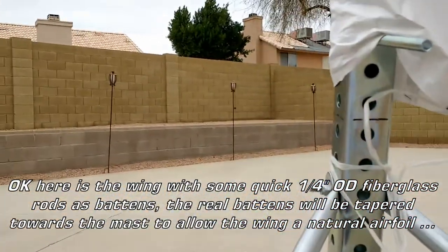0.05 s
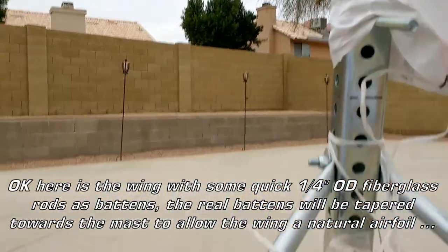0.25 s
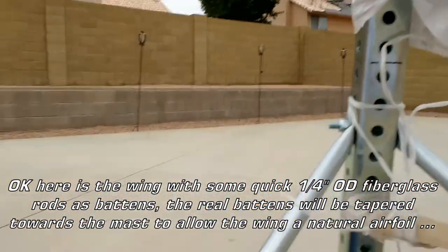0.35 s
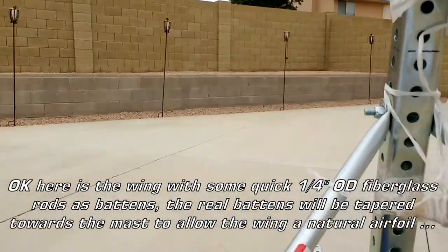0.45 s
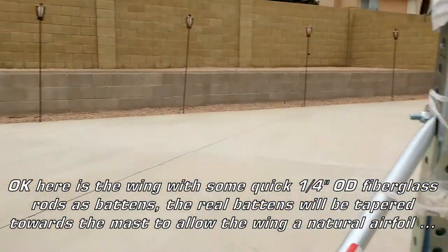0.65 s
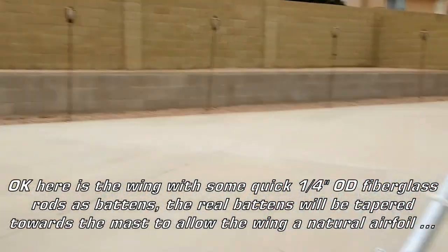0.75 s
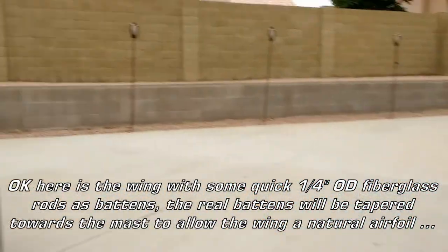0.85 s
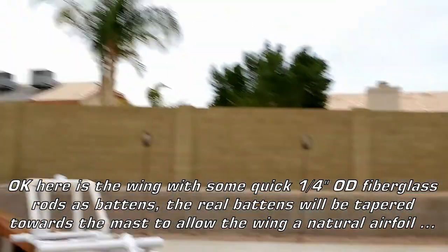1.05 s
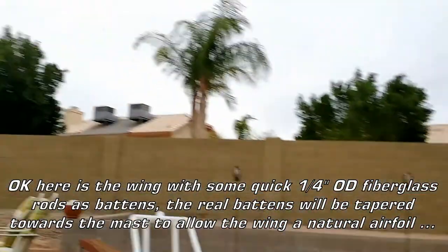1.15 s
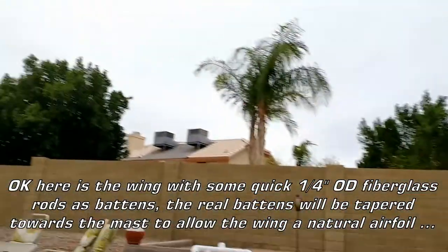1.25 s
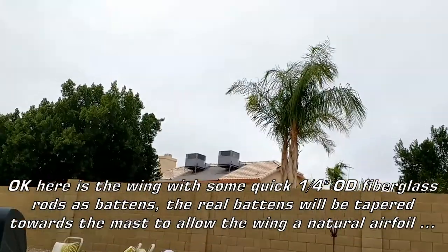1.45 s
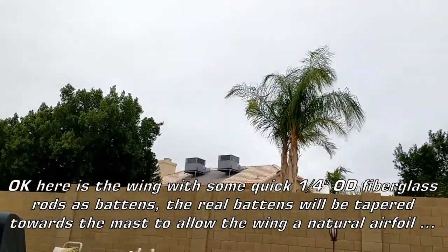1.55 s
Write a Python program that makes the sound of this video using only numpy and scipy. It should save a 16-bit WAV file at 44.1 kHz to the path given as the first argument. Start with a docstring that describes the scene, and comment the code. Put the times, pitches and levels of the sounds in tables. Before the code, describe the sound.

A loose sail sheet rustles and snaps taut from 0.1 seconds, ringing its metal frame, the snaps crowding at 0.3 to 0.5. A faint rubbing tone sinks from 0.6 to 0.9, with one knock at 0.7. Low gusts buffet the microphone, hardest from 0.75 to 1.2. The last snap comes at 1.1, then a sharp, close tick. Rustle and puffs continue over a soft hush of wind in trees.

```python
"""A loose sail sheet on a metal frame in a walled yard, over a hush of wind in trees.
From 0.1 s the sheet rustles and snaps taut, ringing the frame; the snaps crowd at 0.3-0.5 s.
A rubbing tone sinks from 0.6 to 0.9 s; the rig knocks once at 0.7 s. Gusts buffet the microphone
in low puffs, hardest at 0.75-1.2 s. The last snap is at 1.1 s, then one sharp, close tick;
rustle and puffs go on. A late, inverted copy widens the stereo throughout."""
import sys
import numpy as np
from scipy import signal
from scipy.fft import rfft, irfft, next_fast_len
from scipy.io import wavfile
from scipy.ndimage import uniform_filter1d, map_coordinates

SR = 44100
rng = np.random.default_rng(int(sys.argv[2]) if len(sys.argv) > 2 else 0)


def persist_wave(psi):
    """Save psi, clipped to +-1, as 16-bit WAV."""
    counts = np.round(np.clip(psi, -1, 1) * 32767).astype(np.int16)
    wavfile.write(sys.argv[1], SR, np.atleast_2d(counts).T)


N = 70560  # 1.6 s


def amp(db):
    """Decibels to gain."""
    return 10 ** (np.asarray(db) / 20)


def unit(x):
    """Scale to rms 1."""
    return x / np.sqrt(np.mean(x ** 2) + 1e-20)


def along(points, hz):
    """Interpolate (freq_hz, value) points on a log axis."""
    freq_hz, values = np.transpose(points)
    return np.interp(np.log(hz + 1), np.log(freq_hz + 1), values)


def curve(points):
    """Interpolate (time_s, value) points, one value per sample."""
    return np.interp(np.arange(N) / SR, *np.transpose(points))


def wobble(knots_per_s):
    """Smooth random curve."""
    return map_coordinates(rng.standard_normal(N // 10), [np.arange(N) * knots_per_s / SR])


def filtered(x, response):
    """Apply the frequency response response(hz)."""
    size = next_fast_len(N + SR // 2)
    return irfft(rfft(x, size) * response(np.fft.rfftfreq(size, 1 / SR)), size)[..., :N]


def coloured(x, spectrum):
    """Shape x by (freq_hz, level_db) points; rms 1."""
    return unit(filtered(x, lambda hz: amp(along(spectrum, hz))))


def noise(spectrum):
    """Two independent noises with the given spectrum."""
    return coloured(rng.standard_normal((2, N)), spectrum)


def evened(x, samples):
    """Flatten the chance swells of a noise."""
    power = uniform_filter1d(np.abs(signal.hilbert(x)) ** 2, samples)
    return unit(x / np.sqrt(np.abs(power) + 1e-9))


def struck(x, gain_db, size=4096):
    """Pass a short excitation through a minimum-phase filter; output energy 1 per row."""
    cepstrum = irfft(np.log(amp(gain_db(np.fft.rfftfreq(size, 1 / SR)))))
    cepstrum[1:size // 2] *= 2
    cepstrum[size // 2 + 1:] = 0
    impulse_response = irfft(np.exp(rfft(cepstrum)))
    out = signal.fftconvolve(x, impulse_response[None], axes=1)
    return out / np.linalg.norm(out, axis=1, keepdims=True)


def burst(t, t60_s):
    """Two independent decaying noises."""
    return rng.standard_normal((2, len(t))) * amp(-60 * t / t60_s)


def mode(t, hz, t60_s):
    """Decaying sine at two random phases."""
    return np.sin(2 * np.pi * (hz * t + rng.random((2, 1)))) * amp(-60 * t / t60_s)


def add(track, start_s, x):
    """Mix x into the track."""
    i = round(start_s * SR)
    track[:, i:i + x.shape[1]] += x[:, :N - i]


def widened(pair, cross, apart_db, delay_s=25 / SR):
    """Stereo from a shared and a weaker second signal; the left gets the late, inverted copy."""
    shared, apart = pair[0], amp(apart_db) * pair[1]
    late = filtered(np.array([shared, apart]), lambda hz: np.exp(-2j * np.pi * hz * delay_s))
    return np.array([cross * shared - late[0] + apart, shared - cross * late[0] + late[1]])


def yard():
    """Steady hush of wind in the trees around the yard."""
    # freq_hz, level_db
    hush_spectrum = [(30, -24), (120, 3.5), (350, 4), (700, -8), (1100, -12), (2000, -23), (4500, -34),
                     (8000, -27.5), (15000, -40)]
    return widened(amp(-50.5) * noise(hush_spectrum), cross=0.45, apart_db=-4.5)


def wind(strong_db=-7, low_cut_hz=95):
    """Puffs and slapping eddies on the microphone over a rumble; stronger ones reach higher."""
    # peak_s, level_db, rise_s, fall_s
    puffs = [(.092, -31, 0.037, 0.022), (.24, -33.5, 0.017, 0.019), (.33, -26.5, 0.008, 0.027),
             (0.407, -22.5, 0.022, .019), (0.486, -32, 0.007, 0.023), (0.689, -24.5, 0.015, 0.04),
             (.75, -20.5, 0.013, 0.014), (.776, -19.5, 0.0079, 0.0062), (0.861, -21, 0.012, 0.0095),
             (.998, -20.5, 0.019, 0.02), (1.055, -19.5, 0.029, 0.022), (1.107, -16, 0.021, 0.018),
             (1.147, -22.5, 0.013, 0.0048), (1.207, -20, 0.0076, 0.007), (1.314, -31, 0.036, 0.023),
             (1.55, -34.5, 0.028, .03)]
    # centre_s, level_db, pitch_hz
    eddies = [(.236, -24, 110), (.3302, -22, 150), (.391, -13, 135), (.4087, -15.5, 175), (.485, -22, 115),
              (.7597, -6, 180), (.861, -19, 230), (.967, -15, 150), (1.041, -18, 220), (1.0655, -14, 190),
              (1.0815, -11.5, 300), (1.1008, -11.5, 190), (1.1103, -14, 370), (1.129, -23, 500),
              (1.2048, -12, 195), (1.2976, -15.5, 195)]
    # time_s, level_db
    rumble_levels = [(0, -41), (.11, -42), (.17, -43), (.2, -31), (.27, -27.5), (.35, -40), (.4, -28),
                     (.5, -33.5), (.62, -43), (.68, -28), (.75, -25), (.81, -42), (.91, -36), (.95, -25),
                     (1.17, -23.5), (1.26, -36), (1.34, -29), (1.41, -57.5), (1.55, -30.5), (1.6, -49)]
    # freq_hz, level_db
    puff_spectrum = [(20, -34), (50, -19), (90, -5), (140, 4.5), (200, 0.5), (300, -10), (450, -17),
                     (800, -39.5), (2000, -74), (6000, -96)]
    edge_spectrum = [(80, -37), (200, -4), (350, -3), (500, -0.5), (750, -20), (1300, -23.5), (3000, -44),
                     (8000, -76)]
    rumble_spectrum = [(20, -30), (50, -5.5), (85, -0.5), (120, 2), (170, -7.5), (300, -21), (600, -47.5),
                       (2000, -82)]

    def swing(cycles):
        """One brief swing of pressure."""
        return np.sin(2 * np.pi * cycles) * np.exp(-(cycles / 0.63) ** 2)

    t = np.arange(N) / SR
    push = np.sqrt(sum(amp(db) ** 2 * np.exp(-((t - s) / np.where(t < s, rise_s, fall_s)) ** 2)
                       for s, db, rise_s, fall_s in puffs))
    air = push * evened(noise(puff_spectrum), samples=300)
    air += amp(curve(rumble_levels)) * evened(noise(rumble_spectrum), samples=1500)
    air += amp(-24) * (push / amp(strong_db)) ** 1.25 * evened(noise(edge_spectrum), samples=300)
    for centre_s, level_db, pitch_hz in eddies:
        cycles = pitch_hz * (centre_s - t)
        steep_core = amp(-22.5 + 2 * (level_db - strong_db)) * swing(2.9 * cycles)
        air += amp(level_db) * swing(cycles) + steep_core
    air = filtered(air, lambda hz: hz ** 2 / np.hypot(hz ** 2, low_cut_hz ** 2))
    return widened(air, cross=0.027, apart_db=-22)


def tick(start_s=1.139, t60_s=0.007):
    """One dry, bright tick at the microphone."""
    # freq_hz, level_db
    tick_spectrum = [(300, 7), (1300, 4), (3000, -2), (5000, -0.5), (10000, -3.5), (15000, -2.5)]
    out, t = np.zeros((2, N)), np.arange(SR // 50) / SR
    add(out, start_s, amp(-12) * struck(burst(t, t60_s), lambda hz: along(tick_spectrum, hz)))
    return widened(out, cross=0.12, apart_db=-2)


def rubbing(tone_width_hz=170):
    """The sheet rubs with a hollow rush, in which a fuzzy tone sinks."""
    # time_s, pitch_hz, level_db
    tone_glide = [(.57, 1150, -65), (.62, 1070, -49), (.68, 960, -53), (.80, 890, -54), (.86, 770, -57),
                  (.92, 700, -66)]
    # time_s, level_db
    rush_levels = [(0, -53.5), (.28, -48), (.35, -43.5), (.55, -43), (.62, -37.5), (.72, -39), (.82, -45),
                   (.95, -41.5), (1.18, -53.5), (1.35, -45.5), (1.41, -54), (1.6, -47.5)]
    # freq_hz, level_db
    rush_spectrum = [(200, 8), (450, 6), (750, -1), (1000, -0.5), (1400, -7.5), (2200, -16.5),
                     (5000, -39.5)]
    time_s, pitch_hz, level_db = np.transpose(tone_glide)
    phase = 2 * np.pi * np.cumsum(curve(np.c_[time_s, pitch_hz])) / SR
    envelope = np.interp(np.arange(N) / SR, time_s, amp(level_db), left=0, right=0)
    tone = unit(wobble(tone_width_hz) * np.cos(phase) + wobble(tone_width_hz) * np.sin(phase))
    rush = noise(rush_spectrum) * amp(curve(rush_levels))
    return widened(rush + envelope * tone, cross=0.26, apart_db=-13.5)


def rustle(creases_per_s=900, crease_db=-4, flutter_db=2, flutters_per_s=45):
    """The sheet's creases crackle finely over a fluttering hiss."""
    # time_s, level_db
    rustle_levels = [(0, -66), (.26, -54), (.33, -46), (.42, -50.5), (.46, -45.5), (.56, -51), (.62, -40),
                     (.65, -43.5), (.677, -35), (.69, -44), (.76, -52), (.88, -50.5), (.97, -50),
                     (1.10, -46), (1.19, -57.5), (1.25, -45.5), (1.29, -56.5), (1.36, -46), (1.39, -52),
                     (1.45, -56.5), (1.55, -48.5), (1.6, -47)]
    # freq_hz, level_db
    cloth_spectrum = [(300, -13), (1000, -10), (1800, 0.5), (2700, -2.5), (4500, -3), (6300, -9.5),
                      (9000, -16.5), (15000, -31)]
    creases = (rng.random(N) < creases_per_s / SR) * rng.standard_normal((2, N))
    level_db = curve(rustle_levels) + flutter_db * wobble(flutters_per_s)
    cloth = unit(noise(cloth_spectrum) + amp(crease_db) * coloured(creases, cloth_spectrum))
    return widened(cloth * amp(level_db), cross=0.017, apart_db=-10)


def clack(start_s=0.6972, gain_db=-23.5, rise_s=0.0009):
    """A hard part of the rig knocks once and rings briefly."""
    # freq_hz, level_db, t60_s
    rig_modes = [(988, -5.5, 0.055), (1350, -2.5, 0.047), (2170, -2, 0.05), (3097, 5, 0.031),
                 (3935, -2.5, .035), (4870, -1.5, 0.03), (6110, -13, 0.028)]
    out, t = np.zeros((2, N)), np.arange(SR // 5) / SR
    ring = sum(amp(db) * mode(t, hz, t60_s) for hz, db, t60_s in rig_modes)
    add(out, start_s, amp(gain_db) * ring * (1 - np.exp(-t / rise_s)))
    return widened(out, cross=0.077, apart_db=-10)


def snaps():
    """The sheet jerks taut: crack, short crackle, ring of panel and frame, echo off the walls."""
    # start_s, level_db, low_db, high_db, crackle_t60_s, panel_hz
    jerks = [(0.113, -37.5, 6, -4, 0.027, 2640), (0.167, -39, -16, -1, 0.017, 2870),
             (0.2024, -32.5, -4.5, -12.5, 0.021, 2570), (0.2833, -28, -2, -11.5, .025, 2630),
             (0.2912, -22.5, -8, -23, 0.02, 2750), (0.3033, -16.5, -9.5, -22, 0.013, 2910),
             (0.3111, -15.5, -9, -20, 0.035, 2730), (0.3336, -12, -13, -19, 0.014, 2580),
             (0.3426, -21, -9.5, -19.5, 0.025, 2610), (0.353, -20, -13, -22, 0.02, 2640),
             (0.3924, -13.5, -10, -19.5, 0.012, 2600), (.403, -19, -10, -24, 0.012, 2630),
             (0.435, -34, -16, -12, 0.022, 2680), (0.4441, -18, -9, -19.5, 0.022, 2540),
             (.49, -14.5, -9.5, -20, 0.021, 2610), (0.5886, -17, -15, -24, 0.025, 2625),
             (0.6972, -20, -9, -17, 0.031, 2710), (0.842, -32.5, -11.5, -20, .03, 2740),
             (0.915, -20, -17, -23.5, 0.028, 3300), (0.9886, -23.5, -25.5, -15, 0.027, 2200),
             (1.069, -31.5, -16, -16, 0.028, 2740), (1.098, -34.5, -25, -7, .022, 3000)]
    # freq_hz, level_db
    sheet_spectrum = [(200, -15), (700, -9), (1000, -9.5), (1400, 1), (1950, -5.5), (2600, -1), (2950, 0.5),
                      (3350, -9), (4000, -9.5), (4550, -7.5), (5300, -21), (6400, -21), (9000, -34.5),
                      (15000, -47)]
    # freq_hz, level_db, t60_s
    frame_modes = [(1280, -5.5, .12), (1456, -5.5, .1), (1616, 0.5, 0.039), (2568, -7.5, 0.042),
                   (2613, -1, .08), (2910, -3, 0.073), (4290, 3, .05), (4477, 4.5, 0.042),
                   (6230, 11, 0.048)]
    crack_s, crack_share = 0.002, 0.58
    plain_low_db, plain_high_db = -12.5, -17.5  # band levels that give no tilt
    gain_db, echo_db, frame_db, panel_db = 13.5, -11, -6, -3.5
    out, t = np.zeros((2, N)), np.arange(SR // 4) / SR
    for start_s, level_db, low_db, high_db, crackle_t60_s, panel_hz in jerks:
        flat_noise = evened(rng.standard_normal((2, len(t))), samples=20)
        crack = unit(flat_noise * np.exp(-(t / crack_s) ** 2))
        crackle = unit(burst(t, crackle_t60_s))
        echo = amp(echo_db) * unit(burst(t, t60_s=0.17))
        hit = np.sqrt(crack_share) * crack + np.sqrt(1 - crack_share) * crackle + echo
        tilt = [(1400, low_db - plain_low_db), (2600, 0), (4600, high_db - plain_high_db)]
        colour_db = lambda hz: along(sheet_spectrum, hz) + along(tilt, hz)
        frame = sum(amp(db + rng.normal(0, 0.82)) * mode(t, hz, t60_s) for hz, db, t60_s in frame_modes)
        panel = mode(t, panel_hz, t60_s=0.016)
        ring = amp(frame_db) * struck(frame, colour_db) + amp(panel_db) * struck(panel, colour_db)
        add(out, start_s + 0.0005, amp(level_db + gain_db) * (struck(hit, colour_db) + ring))
    return widened(out, cross=0.042, apart_db=-7)


def scene():
    """Sheet, rig, wind, tick and yard together."""
    return snaps() + clack() + rustle() + rubbing() + wind() + tick() + yard()


def record(dry):
    """Brick-wall low-pass."""
    top_hz = 15900
    return filtered(dry, lambda hz: hz < top_hz)


dry = scene()
out = record(dry)
persist_wave(out)
```